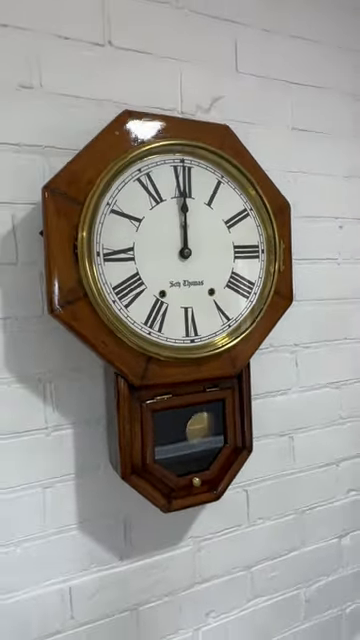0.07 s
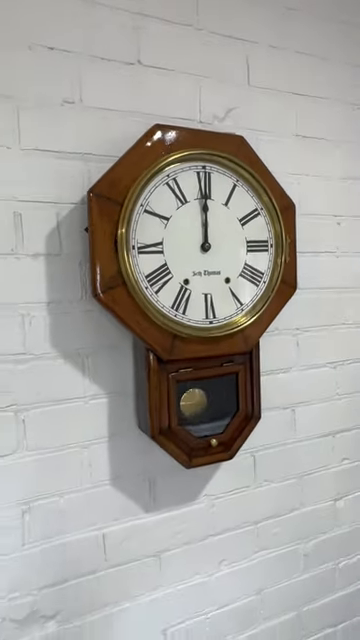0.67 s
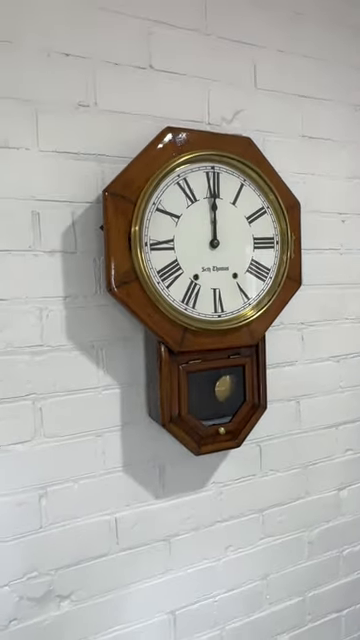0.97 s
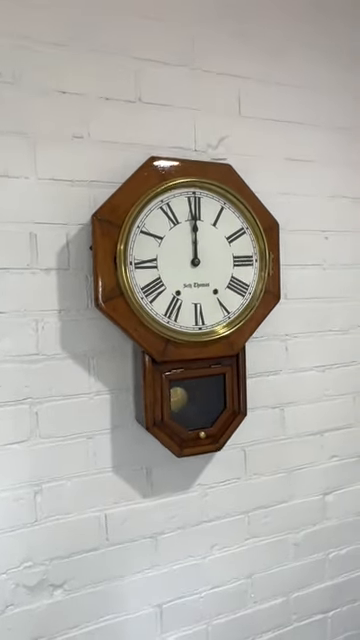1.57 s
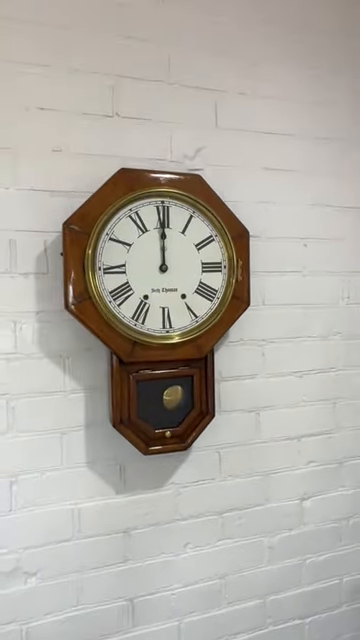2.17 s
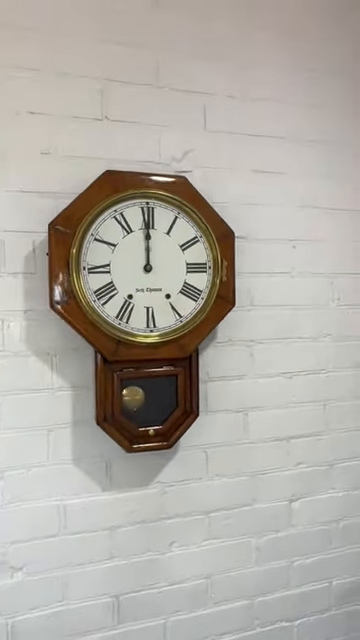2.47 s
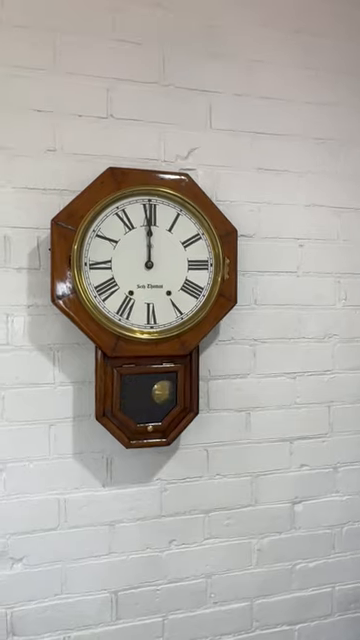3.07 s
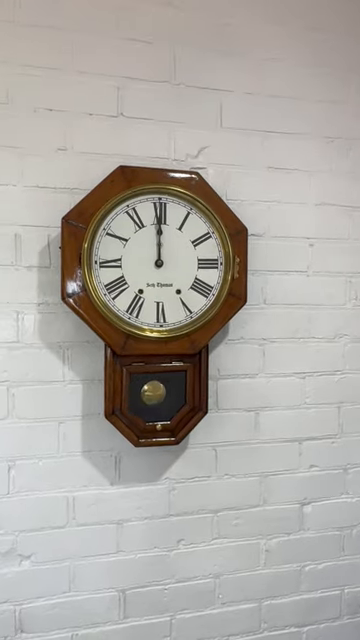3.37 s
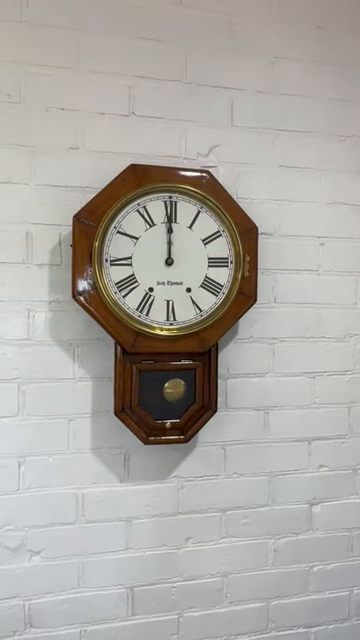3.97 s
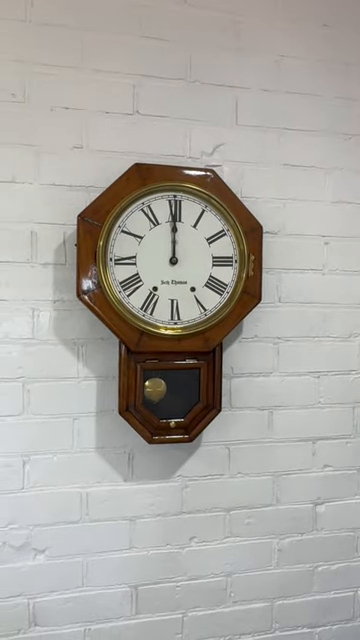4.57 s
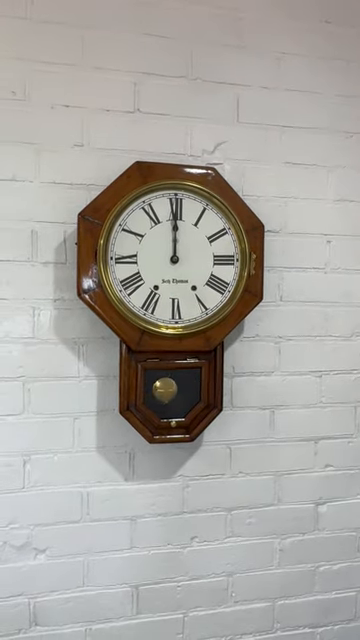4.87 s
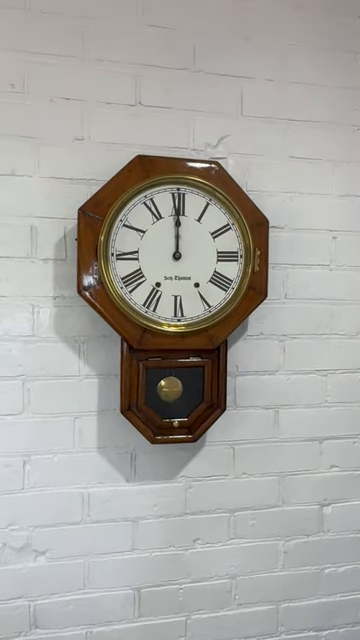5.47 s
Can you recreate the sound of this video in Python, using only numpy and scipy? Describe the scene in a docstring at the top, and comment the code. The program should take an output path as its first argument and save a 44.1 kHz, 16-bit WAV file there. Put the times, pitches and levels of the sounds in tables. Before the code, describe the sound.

A wooden pendulum wall clock strikes two quick blows, each a bright metallic chime with a thump from the case. Gears whir briefly and lock with a clack. The chime wavers and fades over about two seconds, leaving a much softer, regular tick-tock, about two beats a second. It is heard from a step away in a quiet room with a low rumble and slight echo.

```python
"""In a quiet room with painted brick walls, a wooden pendulum wall clock strikes its last two blows.
A hammer rings a steel chime, still sounding from the blow before, and thumps the wooden case.
The gears that drive the hammer whir, then lock with a clack. The chime wavers and fades.
What stays is the tick-tock of a brass wheel, caught tooth by tooth, over a low room rumble."""
import sys
import numpy as np
from scipy import signal
from scipy.fft import rfft, irfft, next_fast_len
from scipy.io import wavfile

SR = 44100
rng = np.random.default_rng(int(sys.argv[2]) if len(sys.argv) > 2 else 0)


def unload_wav(signal):
    """Save mono or channel-first audio to the path in sys.argv[1] as 16-bit WAV at rate SR, clipped to [-1, 1]."""
    wavfile.write(
        sys.argv[1],
        SR,
        np.round(np.clip(np.atleast_2d(signal).T, -1, 1) * 32767).astype(np.int16),
    )


N = 243873

# A mode is one natural tone of an object; t60_s is the time it takes to fade by 60 dB.
# hammer blows on the chime: start_s, level_db, brightness_db_per_octave, buzz_rad, twin_boost_db
HAMMER_BLOWS = [(-0.38, 0.5, -2, 0.3, -0.5), (0.0241, 0, 1, 0.15, 5), (0.43, 0, -0.5, 0.7, 0)]
# chime modes, each with a twin close in pitch:
# pitch_hz, level_db, t60_s, twin_offset_hz, twin_db, left_over_right_db, left_lead_rad
CHIME_MODES = [(1337.8, -35.2, 2.85, -0.85, -14, 0, -0.9), (3442, -27.5, 1.17, -14.3, -6, 0.5, 1.0),
               (6082, -22, 0.48, -2, -20, 3, 1.1), (9194, -26.5, 0.46, -1.73, -4.3, -1.7, -1.2),
               (12780, -18, 0.22, 14, -14, 0, 3.14)]
# slow wavering of the lowest chime mode: time_s, boost_db
LOWEST_MODE_WAVER = [(0.5, -2.5), (0.72, 1.5), (0.84, -13.5), (1.02, 1), (1.25, 0.5), (1.42, -6),
                     (1.65, 4.5), (1.85, 4.5), (2.17, -7)]
# swelling of each chime mode: peak_s, period_s, depth (0-1), left_ear_delay_s
MODE_SWELLS = [(0.697, 0.218, 0.5, -0.012), (0.82, 0.3, 0.3, -0.05), (0.154, 0.651, 0.74, 0.073),
               (0.719, 0.176, 0.45, 0.005), (0, 0.13, 0.3, 0)]
# tone colour of the gears: frequency_hz, level_db
GEAR_SPECTRUM = [(60, -27), (170, -8.5), (270, 4), (350, -3), (420, -9), (600, -11.5), (1400, -1.5),
                 (2200, -11), (4500, -15.5), (7000, -26.5), (10000, -30.5), (12000, -60)]
# tone colour of the room rumble: frequency_hz, level_db
RUMBLE_SPECTRUM = [(25, -6.5), (42, -6), (72, 2.5), (110, -4.5), (170, -12), (260, -15), (400, -14),
                   (650, -28.5), (1000, -28.5), (1800, -38.5), (2400, -32), (3000, -41.5), (8000, -46),
                   (14000, -63.5)]
# rise and fall of a low drone: time_s, level_db
DRONE_LEVELS = [(0.9, -74), (1.49, -68.5), (1.76, -73), (2.15, -65.5), (3.68, -64.5), (4.46, -76.5),
                (5.53, -69)]
# faint rustles: peak_s, level_db, width_s
RUSTLE_EVENTS = [(3.396, -75, 0.026), (4.397, -68.5, 0.0095), (4.419, -69.5, 0.034)]
# tone colour of a rustle: frequency_hz, level_db
RUSTLE_SPECTRUM = [(400, -10), (950, 0.5), (1220, 9.5), (1700, -18), (2700, -25), (3500, -11.5),
                   (5500, -13.5), (9000, -26), (13000, -41.5)]
# hammer thumps, a bounce and lever clacks: start_s, level_db, bass_db, treble_db
CASE_KNOCKS = [(0.0226, -28.5, 4.5, -2), (0.429, -29.5, 0, 0), (0.443, -37, 2.5, -3),
               (0.507, -30, 2.5, -19)]
# tone colour of a knock: frequency_hz, level_db
KNOCK_SPECTRUM = [(60, -29.5), (160, -24), (250, 0), (330, -9.5), (420, -18), (520, -10.5), (1000, -15),
                  (1600, -13), (2600, -17.5), (5000, -25), (8000, -19.5), (10500, -20), (12000, -45),
                  (15500, -52)]
# modes of the wooden case: pitch_hz, level_db, t60_s
CASE_MODES = [(256, -10, 0.52), (310.7, -1, 0.16), (508, -5, 0.37), (557.6, -6.5, 0.63), (668, -15, 0.24),
              (850, -1.5, 0.23), (1152.7, -6.5, 0.45), (1170, -7.5, 0.35), (2295, -17.5, 0.75),
              (3930, -19, 0.41)]
# tick and tock in turn: start_s, level_db, bass_db, treble_db
TICK_TOCKS = [(0.312, -49, 0, -2), (0.828, -48, 4, -2), (1.352, -47.5, -4.5, -2), (1.873, -49, 0, 3),
              (2.386, -52, 5, 5), (2.918, -48.5, -2, 0.5), (3.425, -49.5, -1, -0.5), (3.958, -48.5, 0, 2.5),
              (4.466, -46, -2.5, -8), (4.995, -49.5, 4, 2.5), (5.506, -50.5, 7, 2)]
# tone colour of a tick: frequency_hz, level_db
TICK_SPECTRUM = [(100, -25.5), (200, -6), (280, 1.5), (400, -6.5), (560, -1), (900, -0.5), (1250, -3),
                 (1600, -4.5), (2250, -7), (3200, -12.5), (4600, -20), (7500, -21), (10000, -27),
                 (14000, -71)]
# modes of the brass wheel and its two catches, called pallets: pitch_hz, level_db, t60_s
BRASS_MODES = [(1789, -10, 0.045), (2010, -5.5, 0.11), (2258, 1, 0.015), (3001, -18.5, 0.11)]
# modes of one pallet: pitch_hz, level_db, t60_s
PALLET_MODES = [(2080, -4, 0.11), (3270, -11.5, 0.11), (3769, -14, 0.22), (3833, -17.5, 0.2),
                (4010, -14, 0.16)]
# how alike noise is in the two ears: frequency_hz, likeness (-1 to 1)
EAR_LIKENESS = [(30, .94), (70, .83), (150, .94), (300, .93), (700, .55), (1500, .4), (3000, .35),
                (6000, .3), (9000, .1), (13000, -.6)]
# how long the room echoes: frequency_hz, t60_s
ROOM_DECAY = [(150, 0.48), (500, 0.46), (1200, 0.5), (2500, 0.38), (5000, 0.33), (10000, 0.13)]


def from_db(db):
    """Turn decibels into a gain."""
    return 10 ** (np.asarray(db) / 20)


def at_hz(points, hz):
    """Read a table at any frequency, with octaves evenly spaced."""
    known_hz, values = np.transpose(points)
    return np.interp(np.log(np.maximum(hz, 1)), np.log(known_hz), values)


def fade(t, t60):
    """A smooth fade that is 60 dB down after t60 seconds."""
    return np.exp(-np.log(1000) * t / t60)


def filtered(x, order, hz, kind):
    """Keep the lows, the highs or a band; a higher order cuts more steeply."""
    return signal.sosfilt(signal.butter(order, hz, kind, fs=SR, output="sos"), x)


def add(out, start_s, sound):
    """Mix a sound into out from start_s on."""
    start = max(round(start_s * SR), 0)
    out[:, start:start + sound.shape[-1]] += sound[..., :N - start]


def noise(colour, size):
    """Stereo noise of strength 1 with a given tone colour, alike in both ears in the bass."""
    padded = next_fast_len(size)
    hz = np.fft.rfftfreq(padded, 1 / SR)
    mid, side = rfft(rng.standard_normal((2, padded)))
    alike = np.clip(at_hz(EAR_LIKENESS, hz), -1, 1)
    ears = np.sqrt(1 + alike) * mid + np.sqrt(1 - alike) * side * [[1], [-1]]
    x = irfft(ears * from_db(at_hz(colour, hz)), padded)[:, :size]
    return x / x.std()


def chime(middle_hz=3450, attack_s=0.0015, twin_lead_rad=0.17, buzz_hz=(59.5, 138.278), buzz_t60=0.354):
    """Each blow restarts the steel's ring; twin modes throb together and the jolted mount buzzes."""
    out, now = np.zeros((2, N)), np.arange(N) / SR
    ears = np.array([[.5], [-.5]])  # left, right
    start_s, level_db, bright_db, buzz_rad, twin_boost_db = np.transpose(HAMMER_BLOWS)
    blow = np.searchsorted(start_s, now) - 1  # the latest blow at each moment
    age = now - start_s[blow]
    waver_db = np.interp(now, *np.transpose(LOWEST_MODE_WAVER))
    for k, (hz, db, t60, offset_hz, twin_db, pan_db, lead_rad) in enumerate(CHIME_MODES):
        shake = filtered(rng.standard_normal(N), 2, buzz_hz, "band")
        buzz = buzz_rad[blow] * fade(age, buzz_t60) * shake / shake.std()
        tone = np.exp(1j * (2 * np.pi * hz * age + buzz))
        # in the low modes the twin sends its sound in another direction
        twin_direction = np.exp(1j * twin_lead_rad * ears * (hz < middle_hz * 1.3))
        twin = np.exp(2j * np.pi * offset_hz * age) * twin_direction
        throb = 1 + from_db(twin_db + twin_boost_db[blow]) * twin
        blow_db = level_db[blow] + bright_db[blow] * np.log2(hz / middle_hz)
        gain = from_db(db + waver_db * (k == 0) + blow_db) * fade(age, t60)
        at_ears = from_db(pan_db * ears) * np.exp(1j * lead_rad * ears)
        swell = standing_wave(MODE_SWELLS[k], now, age, ears)
        out += gain * np.imag(tone * throb * at_ears * swell)
    return out * (1 - np.exp(-age / attack_s))


def standing_wave(swell, now, age, ears, build_s=0.0067):
    """As the listener walks, a tone and its echo slide in and out of step, so it swells and sinks."""
    peak_s, period_s, depth, delay_s = swell
    turn = 2 * np.pi * (now - peak_s - delay_s * ears) / period_s
    return 1 + depth * (1 - np.exp(-age / build_s)) * np.exp(1j * turn)


def wall_echoes(x, echo_db, t60, dull_hz=9000):
    """The hard walls add a wash of echoes without the highest treble."""
    t = np.arange(SR // 2) / SR
    echoes = rng.standard_normal((2, len(t))) * fade(t, t60)
    echoes /= np.sqrt(np.sum(echoes ** 2, axis=1, keepdims=True))
    echoes = filtered(echoes, 6, dull_hz, "low")
    return x + from_db(echo_db) * signal.fftconvolve(x, echoes, axes=1)[:, :N]


def gear_whir(level_db=-42, lock_s=0.47, run_down_t60=0.63, teeth_hz=46, rattles_per_s=40):
    """Gears and their air brake whir, pulsing with the teeth and rattling at random, until they lock."""
    out, t = np.zeros((2, N)), np.arange(2 * SR) / SR
    teeth = 1 + 0.1 * np.sin(2 * np.pi * teeth_hz * t)
    slips = (rng.random(len(t)) < rattles_per_s / SR) * rng.random(len(t))
    one_rattle = fade(t, t60=0.033) * (1 - np.exp(-t / 0.0013))
    rattle = from_db(-1) * signal.fftconvolve(slips, one_rattle)[:len(t)]
    run_down = fade(np.maximum(t - lock_s, 0), run_down_t60)
    add(out, 0, from_db(level_db) * noise(GEAR_SPECTRUM, len(t)) * (teeth + rattle) * run_down)
    return out


def room_background(rumble_db=-63):
    """A steady low rumble with a faint hiss, a drone that comes and goes, and soft rustles."""
    t = np.arange(N) / SR
    rumble = from_db(rumble_db) * noise(RUMBLE_SPECTRUM, N)
    drone_spectrum = [(110, -26.5), (160, 1), (200, 0), (260, -20.5),  # frequency_hz, level_db
                      (365, -25.5), (395, -4), (440, -26), (900, -59.5)]
    drone = from_db(np.interp(t, *np.transpose(DRONE_LEVELS))) * noise(drone_spectrum, N)
    rustle_gain = sum(from_db(db) * np.exp(-.5 * ((t - peak_s) / width_s) ** 2)
                      for peak_s, db, width_s in RUSTLE_EVENTS)
    return rumble + drone + rustle_gain * noise(RUSTLE_SPECTRUM, N)


def clatter(colour, t, crack_db, crack_t60, build_s):
    """Two parts meet with a sharp crack; its echoes build up, then die away band by band."""
    spectrum, hz = rfft(noise(colour, len(t))), np.fft.rfftfreq(len(t), 1 / SR)
    crack, out = from_db(crack_db) * fade(t, crack_t60), 0
    centres = np.log([row[0] for row in ROOM_DECAY])
    for band, (_, t60) in zip(np.eye(len(ROOM_DECAY)), ROOM_DECAY):
        share = np.interp(np.log(hz + 1), centres, band)
        echoes = fade(t, t60) * (1 - np.exp(-t / build_s))
        out = out + irfft(spectrum * share, len(t)) * (crack + echoes)
    return out


def ring(modes, t, scatter_db=3):
    """A struck object rings in fading tones, each with a new strength on every blow."""
    return sum(from_db(db + scatter_db * rng.normal()) * fade(t, t60)
               * np.sin(2 * np.pi * hz * t) * (-1) ** k
               for k, (hz, db, t60) in enumerate(modes))


def bass_and_treble(x, bass_db, treble_db):
    """A blow's weight and hardness lift or lower its bass and treble."""
    bass = filtered(x, 1, hz=600, kind="low")
    treble = filtered(x, 1, hz=2500, kind="high")
    return x + (from_db(bass_db) - 1) * bass + (from_db(treble_db) - 1) * treble


def case_knocks(case_db=-2, clatter_db=-3, dull_hz=350):
    """The hammer's kick and the locking lever shake the case; heavy blows favour its low modes."""
    out, t = np.zeros((2, N)), np.arange(SR) / SR
    for start_s, level_db, bass_db, treble_db in CASE_KNOCKS:
        contact = clatter(KNOCK_SPECTRUM, t, crack_db=8, crack_t60=0.038, build_s=0.0038)
        wood = filtered(ring(CASE_MODES, t), 2, dull_hz, "low")
        knock = from_db(clatter_db) * contact + from_db(case_db) * wood
        add(out, start_s, from_db(level_db) * bass_and_treble(knock, bass_db, treble_db))
    return out


def tick_tock(brass_db=2, case_db=-7, clatter_db=-3, panel_db=-9, panel_t60=0.19, wood_build_s=0.004):
    """At each swing a tooth drops on a pallet: brass pings, then case, thin panels and room answer."""
    out, t = np.zeros((2, N)), np.arange(SR // 2) / SR
    panel_hz = np.geomspace(450, 8000, 40) * np.exp(rng.uniform(-.03, .03, 40))
    panel_modes = [(hz, at_hz(TICK_SPECTRUM, hz), panel_t60) for hz in panel_hz]
    for swing, (start_s, level_db, bass_db, treble_db) in enumerate(TICK_TOCKS):
        pallet_db = -12 if swing % 2 else -17  # the tock's pallet rings more than the tick's
        contact = clatter(TICK_SPECTRUM, t, crack_db=-5, crack_t60=0.02, build_s=0.024)
        ping = from_db(brass_db) * ring(BRASS_MODES, t) + from_db(pallet_db) * ring(PALLET_MODES, t)
        # neighbouring panel modes reach the ears in and out of step
        panels = ring(panel_modes[::2], t) + ring(panel_modes[1::2], t) * [[.5], [-.5]]
        wood = from_db(panel_db) * panels + from_db(case_db) * ring(CASE_MODES, t)
        wood *= 1 - np.exp(-t / wood_build_s)
        tick = from_db(clatter_db) * contact + ping + wood
        add(out, start_s, from_db(level_db) * bass_and_treble(tick, bass_db, treble_db))
    return out


def scene():
    """The clock on its wall, heard from a step away."""
    # the small case gives off little sound below its lowest mode
    striking = filtered(case_knocks() + gear_whir(), 3, hz=198, kind="high")
    clock_and_room = striking + tick_tock() + room_background()
    clock_and_room[1] = np.roll(clock_and_room[1], 2)  # reaches the right ear two samples later
    return wall_echoes(chime(), echo_db=-11, t60=0.4) + clock_and_room


def record(dry, lowest_hz=30, highest_hz=15800):
    """Cut the deepest bass and the top treble."""
    x = filtered(dry, 2, lowest_hz, "high")
    return signal.sosfilt(signal.ellip(10, .1, 90, highest_hz, fs=SR, output="sos"), x)


dry = scene()
out = record(dry)
unload_wav(out)
```